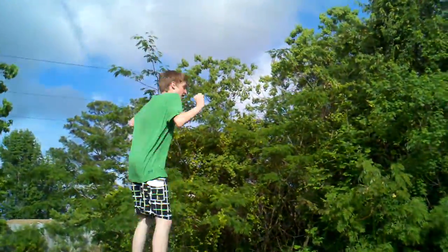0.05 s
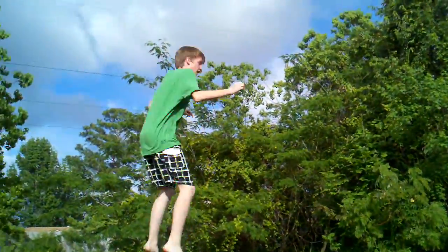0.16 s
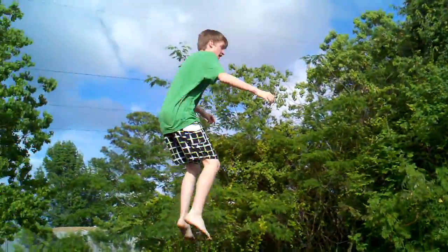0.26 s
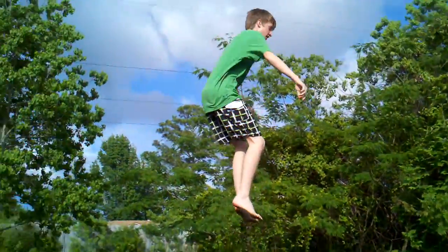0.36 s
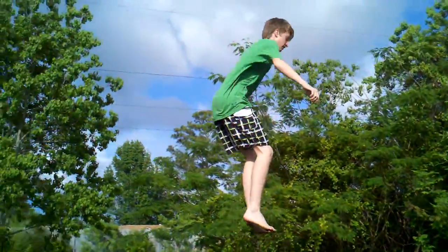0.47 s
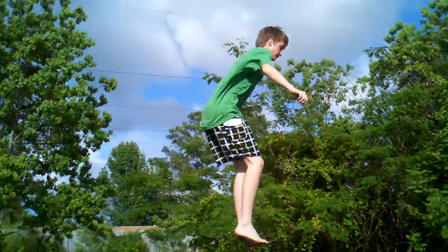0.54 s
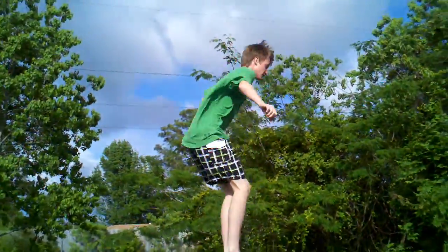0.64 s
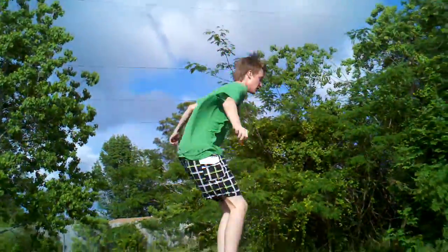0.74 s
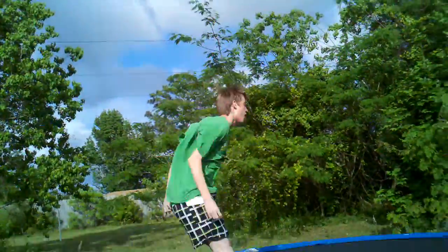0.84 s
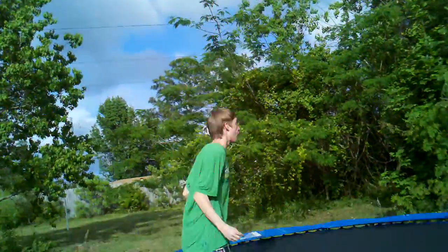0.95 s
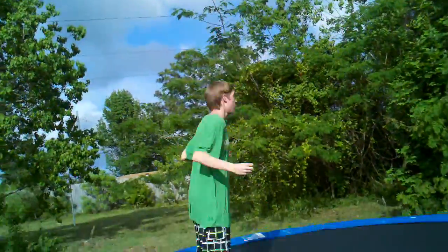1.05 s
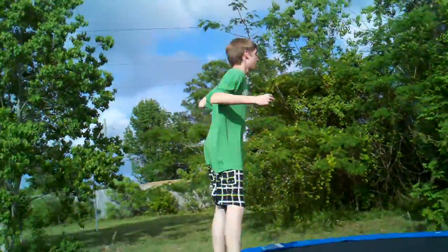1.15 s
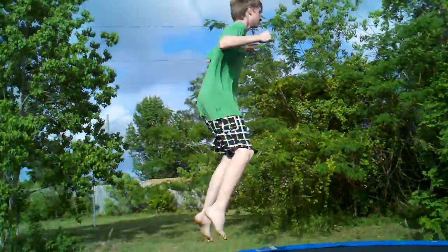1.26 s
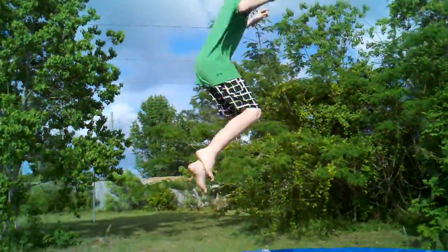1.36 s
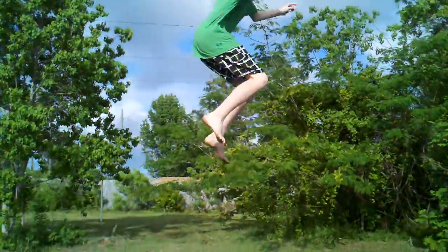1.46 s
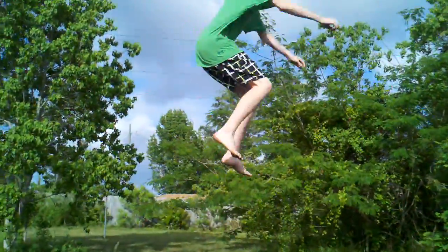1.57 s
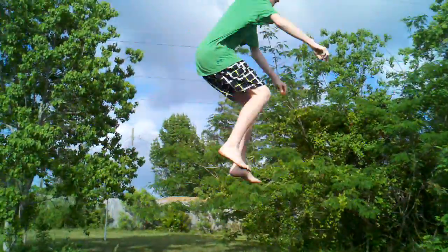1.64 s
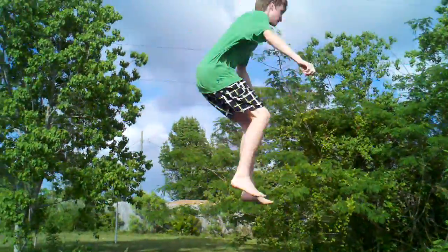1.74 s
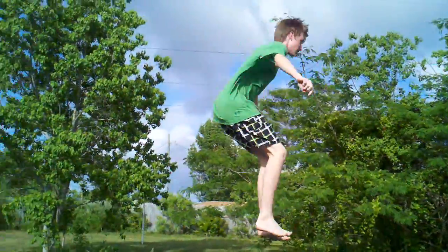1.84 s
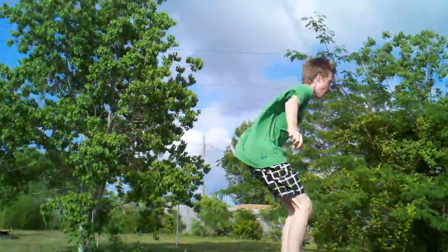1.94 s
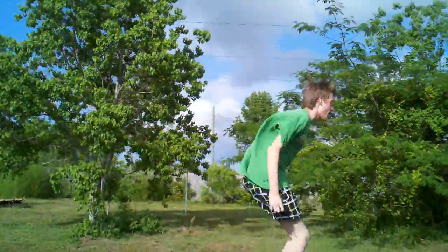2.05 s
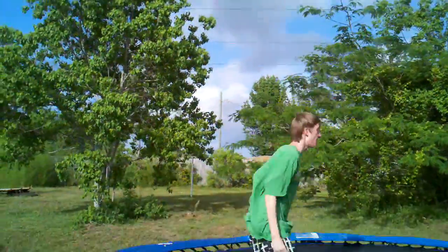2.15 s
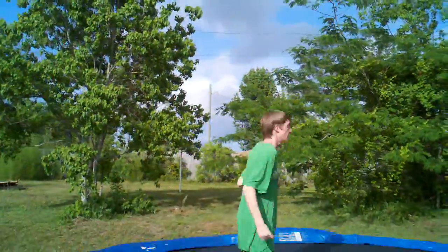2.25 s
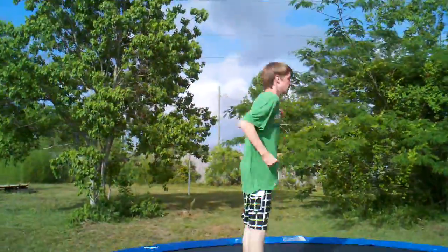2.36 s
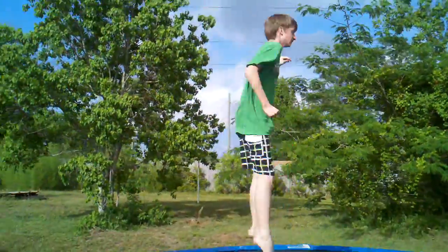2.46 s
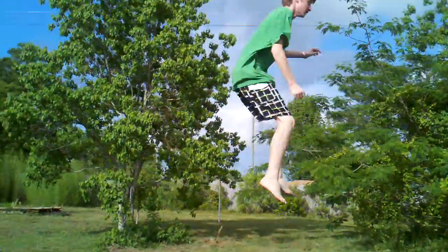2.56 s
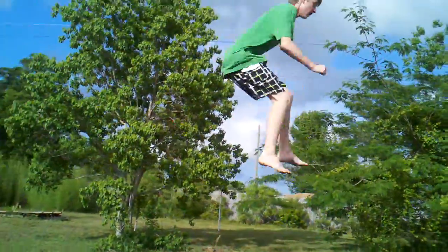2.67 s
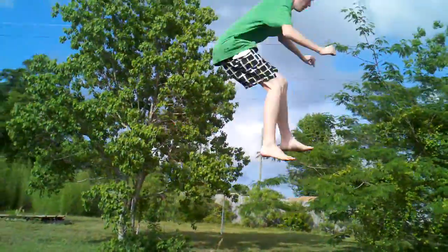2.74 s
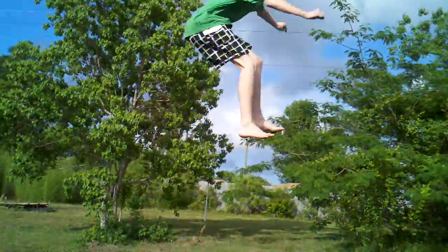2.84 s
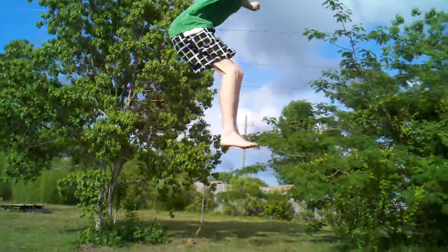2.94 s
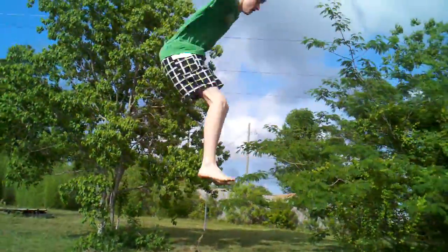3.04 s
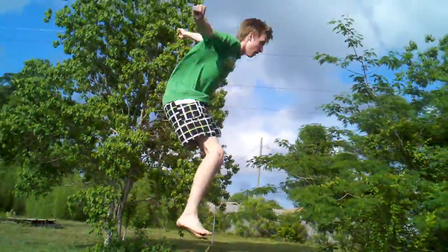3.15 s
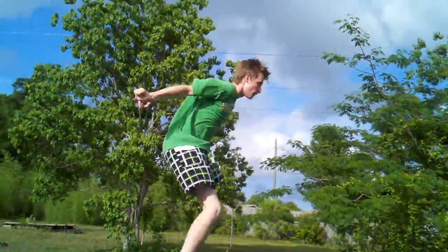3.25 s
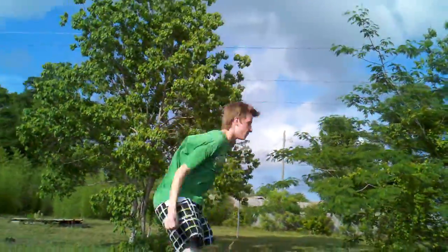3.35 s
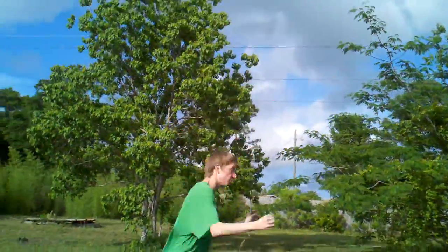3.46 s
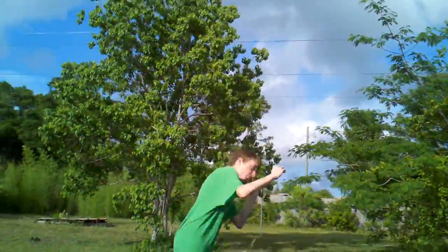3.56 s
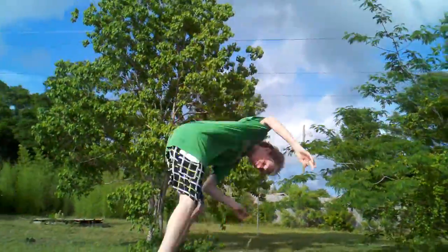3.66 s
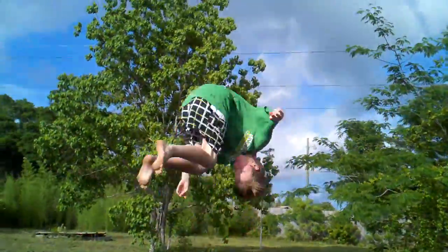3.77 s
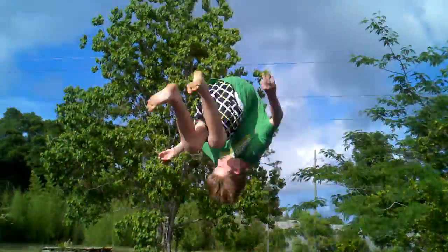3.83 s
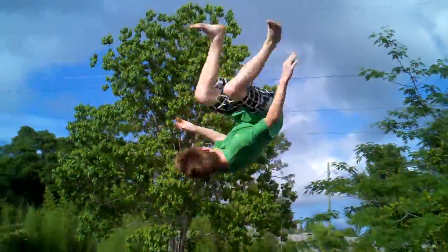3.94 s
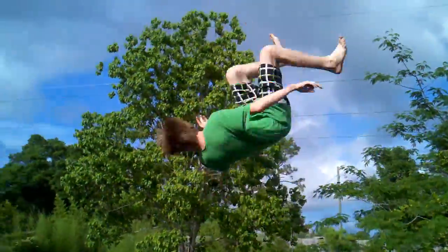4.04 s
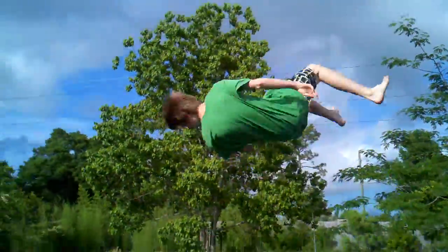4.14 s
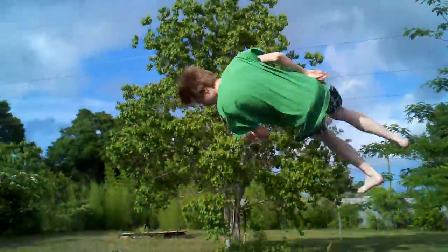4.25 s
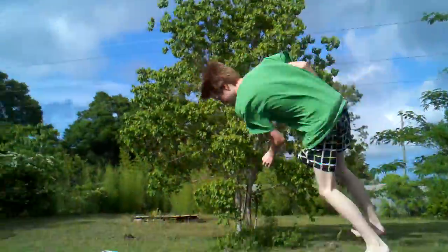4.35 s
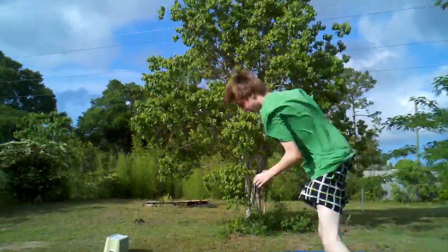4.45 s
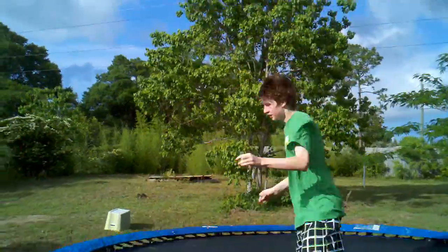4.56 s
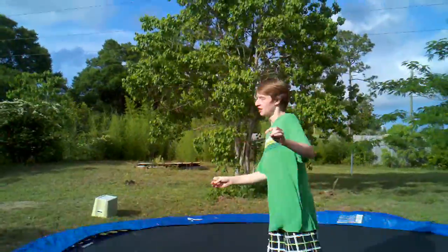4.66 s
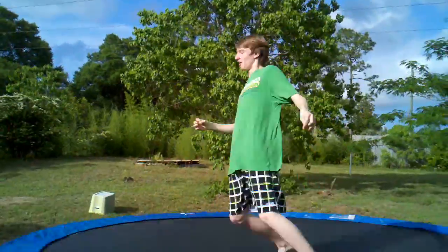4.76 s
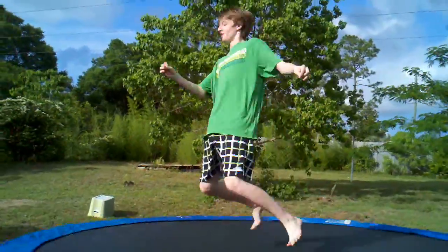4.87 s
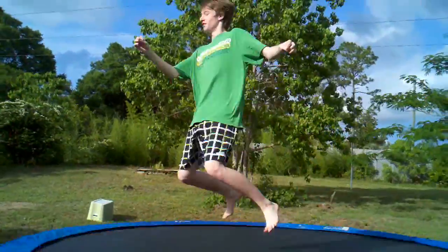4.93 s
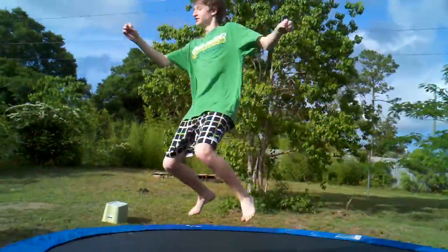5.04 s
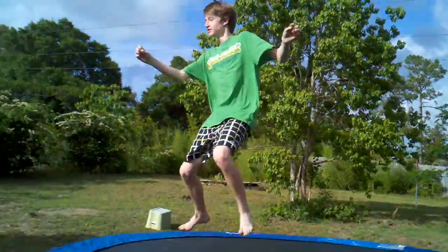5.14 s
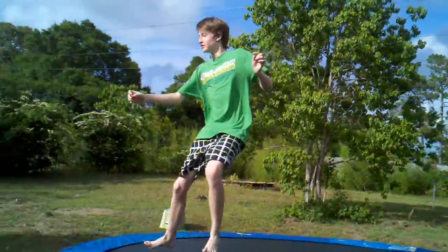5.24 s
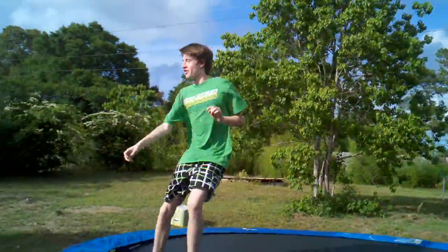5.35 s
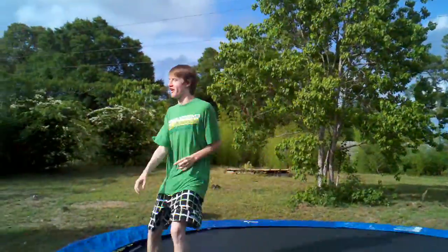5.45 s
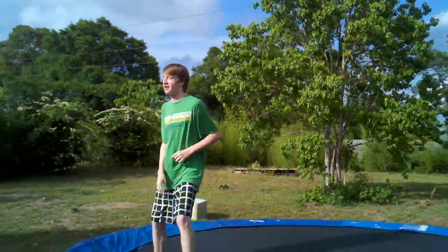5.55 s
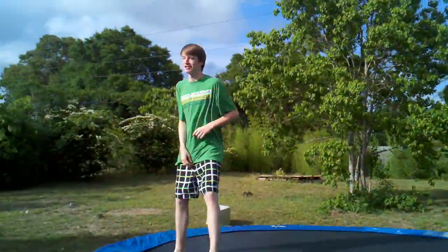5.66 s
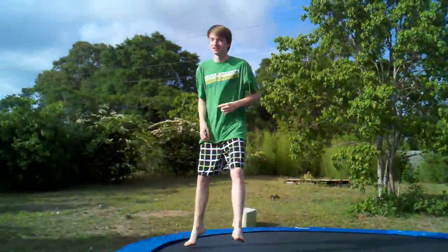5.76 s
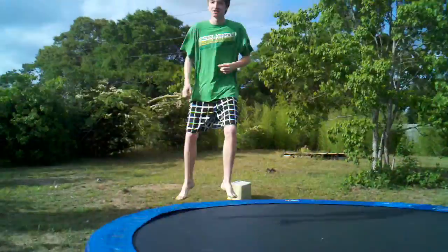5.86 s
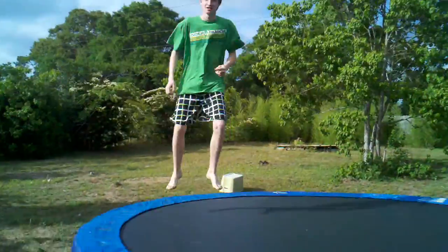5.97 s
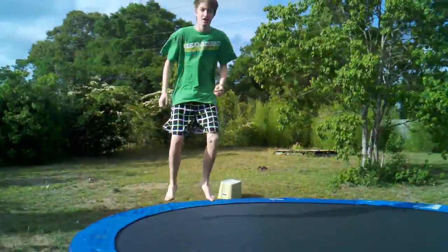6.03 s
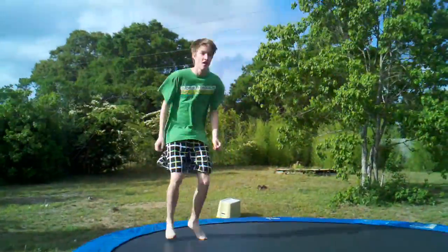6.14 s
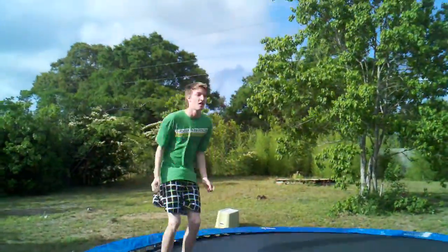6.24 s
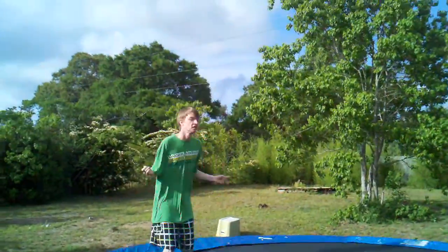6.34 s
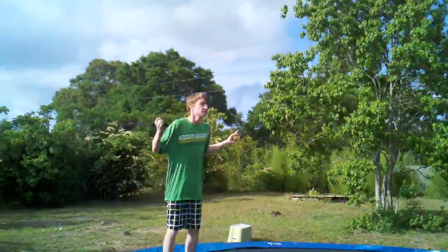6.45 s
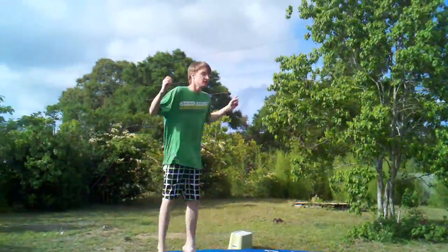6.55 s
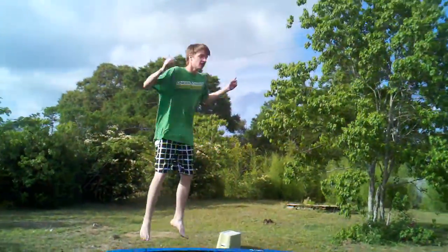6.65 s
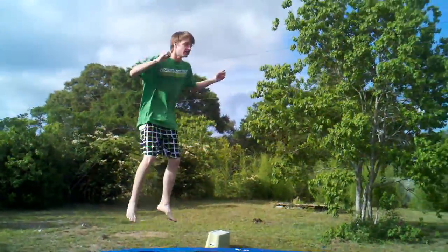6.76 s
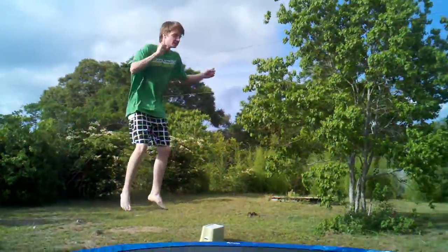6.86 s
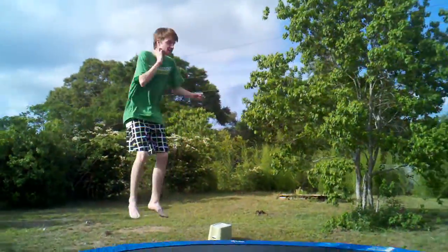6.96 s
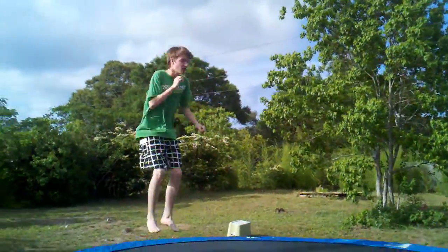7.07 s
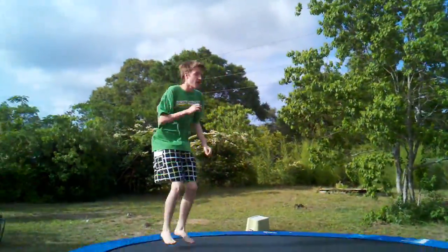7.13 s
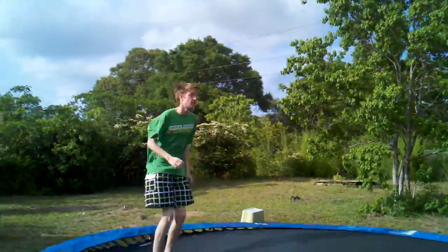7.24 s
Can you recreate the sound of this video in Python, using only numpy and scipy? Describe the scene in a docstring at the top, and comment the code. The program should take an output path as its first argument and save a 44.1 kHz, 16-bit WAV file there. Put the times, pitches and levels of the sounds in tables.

```python
"""Trampoline bounces: filtered noise hisses and rushes through the mat as it sinks and rises.
On deep landings the springs creak: resonant grating, gliding squeaks, sharp slips and frame knocks.
Coils sing and ping, loose springs tick, and the sinking mat shoves a low push of air.
Behind: traffic noise, whines and a far engine on one bearing that moves as the camera pans,
rustling leaves all round, and low noise puffs of breeze on the camera's two microphone ports."""
import sys
import numpy as np
from scipy import signal
from scipy.fft import rfft, irfft
from scipy.io import wavfile
from scipy.ndimage import uniform_filter1d, map_coordinates

SR = 44100
rng = np.random.default_rng(int(sys.argv[2]) if len(sys.argv) > 2 else 0)


def inscribe(sig):
    """Save sig as 16-bit PCM at rate SR to the path in sys.argv[1].

    A 1-D sig is mono; a 2-D sig holds one channel per row.
    Samples are clipped to [-1, 1] before scaling.
    """
    pcm = np.round(np.clip(np.atleast_2d(sig).T, -1, 1) * 32767)
    wavfile.write(sys.argv[1], SR, pcm.astype(np.int16))


N = 321930
T = np.arange(N) / SR
FREQ_HZ = np.fft.rfftfreq(N, 1 / SR)

# Bounces: (touchdown [s], foot contact ramp [s], touch hiss [dB], fastest sinking [s], sinking half length [s],
#           sinking hiss [dB], fastest rising [s], rising hiss [dB], settling time per 20 dB [s],
#           hollow rush re hiss [dB], low push of air re sinking hiss [dB])
BOUNCES = [(-.27, .03, -40, -.17, .06, -24, .02, -28.3, .3, -9.5, -13),
           (.875, .03, -40, 1.008, .053, -21.5, 1.22, -33.3, .46, -12, -10),
           (2.105, .09, -30, 2.258, .056, -23, 2.43, -29.7, .34, -5.5, -3.5),
           (3.395, .03, -46, 3.522, .066, -24.2, 3.785, -31, .25, -7.5, -8),
           (4.539, .003, -31, 4.655, .062, -24.8, 4.88, -26.2, .29, -8.5, -13),
           (5.385, .025, -38, 5.492, .05, -22.7, 5.79, -28, 0.21, -9, -16),
           (6.25, .06, -33, 6.388, .052, -24.5, 6.61, -26.8, .25, -8, -16),
           (7.25, .04, -43, 7.38, .06, -27, 7.63, -30, .3, -1, -13)]
# Swishes as the feet leave or the empty mat flaps: (time [s], half length [s], hiss [dB])
FLAPS = [(0.132, .016, -33), (.345, .025, -48), (1.187, .02, -33), (1.48, .04, -44), (2.555, .03, -31.5),
         (2.635, .035, -35), (3.912, .02, -36), (4.03, .035, -48), (5.07, 0.029, -35), (6.017, .025, -37),
         (6.648, .028, -28)]
# Hiss spectrum of the weave: (frequency [Hz], level [dB])
WEAVE_SPECTRUM = [(500, -45), (1500, -6), (2700, 1.5), (4100, -2), (5300, 0), (6600, -1), (8500, 3),
                  (10200, -3.5), (12000, -2), (14000, -4.5)]
# Resonances of the hollow rush: (frequency [Hz], width [Hz], level [dB])
MAT_MODES = [(470, 1100, 8), (1210, 190, 4.5), (1476, 400, 6.5), (2020, 300, 1.5)]
# Rush spectrum after the resonances: (frequency [Hz], level [dB])
RUSH_SPECTRUM = [(150, 2), (400, 7.5), (2200, 5.5), (4500, -1.5)]
# Coils singing out of the hiss: (time [s], half length [s], frequency [Hz], width [Hz], level [dB])
SINGING = [(0.99, 0.022, 4170, 200, -37), (1.193, 0.021, 1460, 90, -37), (4.573, 0.023, 1540, 160, -34),
           (4.863, 0.03, 1490, 160, -32.5), (5.5, 0.025, 1470, 250, -33.5),
           (5.796, 0.062, 7200, 600, -32.5), (6.372, 0.022, 1400, 200, -35), (6.39, 0.03, 2030, 160, -35),
           (6.65, .02, 7450, 250, -28)]
# Springs slipping on their hooks under load: (start [s], length [s], level [dB], frame rumble [dB],
#           squeak pitch at start [Hz], at end [Hz])
CREAKS = [(1.072, 0.043, -26.5, -16.5, 1400, 1270), (2.314, 0.044, -27, -15, 1080, 1350),
          (3.591, 0.044, -28, -15.5, 1250, 1520), (4.724, 0.031, -25.5, -19.5, 1640, 1430)]
# Hardest slips: (time [s], ring envelope peak [dB], ring pitch [Hz], crack re ring [dB])
SLIPS = [(1.0838, -14, 1430, -1), (1.0862, -16, 1700, 0), (1.0985, -22, 1300, 9), (1.1020, -22, 1600, 0),
         (1.1120, -30, 1250, 10), (2.3245, -24, 1900, 3), (2.329, -21.5, 1100, 5), (2.3355, -21.5, 1400, 7),
         (2.3505, -22, 1300, 5), (3.6028, -23, 1750, 12), (3.607, -22, 1150, 5), (3.6142, -23, 1350, 6),
         (3.630, -18.5, 1900, 7), (3.6335, -26, 2000, 11), (4.7258, -17.5, 1650, -2),
         (4.7342, -17, 1600, 3), (4.7398, -18.5, 1450, 1), (4.7478, -18.5, 1500, 1)]
# Frame knocks as it takes the load and rocks back: (time [s], envelope peak [dB], pitch [Hz])
KNOCKS = [(1.091, -14, 225), (1.096, -16, 380), (1.106, -18, 230), (1.099, -21, 800), (2.3165, -16, 300),
          (2.349, -12, 220), (3.583, -16, 300), (3.600, -18, 500), (3.630, -17, 330), (4.721, -22, 380),
          (4.734, -18, 480), (4.746, -16, 520), (5.568, -24, 100), (5.912, -17.5, 160), (5.932, -23.5, 85),
          (5.977, -27, 100), (6.354, -21, 440), (6.432, -26, 100)]
# Ring of springs and frame: (frequency [Hz], width [Hz], level [dB])
SPRING_MODES = [(414, 610, 10), (760, 300, 5), (1280, 380, 4), (1830, 420, 5), (3000, 350, -7),
                (4300, 900, -19)]
# Frame rumble spectrum: (frequency [Hz], level [dB])
RUMBLE_SPECTRUM = [(35, -36), (75, -9), (120, -6), (185, 3), (270, -2), (450, -8.5), (1000, -46)]
# Ticks of loose springs: (time [s], level at onset [dB])
TICKS = [(4.008, -46), (4.5407, -28), (6.828, -26.5)]
# Ring of a tick: (frequency [Hz], width [Hz], level [dB])
TICK_MODES = [(3900, 1200, -7), (7700, 1000, 22), (12000, 2500, -19)]
# Traffic bearing as the camera pans: (time [s], angle to the left [degrees])
BEARING = [(0, -43), (1.7, -39), (2.3, -24), (2.9, -26), (4.1, 0), (4.8, 21), (5.3, 46), (7.3, 47)]
# Traffic hum: (time [s], level [dB])
TRAFFIC_LEVEL = [(0, -33), (.7, -32), (1.9, -31), (2.15, -27), (2.5, -30.5), (3.25, -29.8), (4.1, -31.5),
                 (5.1, -29), (6.7, -28.5), (7.3, -30.5)]
# Traffic hum spectrum: (frequency [Hz], level [dB])
TRAFFIC_SPECTRUM = [(25, -46), (60, -13), (125, -6.5), (175, 1.5), (240, 0), (330, 0.5), (480, -2.5),
                    (700, -16.5), (1000, -17), (1500, -24.5), (2500, -34), (5000, -54)]
# Tyre roar of passing cars: (loudest [s], half length [s], level [dB])
CARS = [(.7, 1, -36.5), (2.196, 0.37, -38.5), (6.1, 0.33, -43.5), (7.3, 0.47, -36)]
# Tyre roar spectrum: (frequency [Hz], level [dB])
TYRE_SPECTRUM = [(350, -6.5), (620, 3.0), (800, -4.0), (1200, -18), (2500, -34)]
# Faint whines in the traffic: (start [s], end [s], frequency [Hz], amplitude [dB])
WHINES = [(-.5, .95, 1001, -45.5), (1.3, 2.6, 1001, -54), (.25, 2.35, 942, -50), (-.5, 2.2, 188, -42.5),
          (5.7, 7.6, 1000, -53), (5.75, 7.6, 1055, -46.5), (6.1, 7.6, 938, -47.5), (6.2, 7.6, 588, -47)]
# Distant engine gathering speed: (time [s], firing rate [Hz], second-harmonic amplitude [dB])
ENGINE = [(0, 146, -60), (2.6, 147, -44), (3.4, 150, -40.5), (4.8, 150, -37), (5.3, 153, -37.5),
          (6.2, 153.5, -36), (6.7, 157.5, -37.5), (7.3, 162, -38)]
# Leaf rustle: (time [s], level [dB])
LEAVES_LEVEL = [(0, -47), (.7, -43.5), (2.3, -40.5), (2.9, -43), (3.7, -41.5), (4.3, -49), (5.2, -40.5),
                (6.7, -38), (7.3, -39.5)]
# Leaf rustle spectrum: (frequency [Hz], level [dB])
LEAVES_SPECTRUM = [(40, -8), (200, 6.5), (700, 9.5), (1400, 5), (2500, 1), (4000, -6.5), (5500, -9.5),
                   (8500, -8.5), (11000, -14.5), (14000, -19)]
# Light air between puffs: (time [s], level [dB])
BREEZE_LEVEL = [(0, -63), (3.8, -56), (4.3, -46), (7.3, -45)]
# Puffs on the ports: (time [s], level [dB], half length [s])
PUFFS = [(4.43, -37, .014), (4.68, -38, .12), (5.58, -29, .015), (5.94, -34, 0.03), (6.73, -38, .016)]
# Wind spectrum: (frequency [Hz], level [dB])
WIND_SPECTRUM = [(20, -28), (60, -6), (85, 6), (170, 2), (300, -21), (700, -35), (3000, -70)]
# Colour of the camera's microphones: (frequency [Hz], gain [dB])
MICROPHONE = [(1000, 0), (1600, -.3), (2050, 1), (2400, -.5), (2900, 1.5), (3350, -.5), (3800, -1),
              (4080, 1.8), (4400, -.2), (5400, -.7), (6000, .5), (7000, .7), (9000, .4)]

LIFT_S, LIFT_RUSH_DB = .58, -2.5  # time to gain 20 dB while rising; weaker rush on the way up
STROKE_ROUND_S, WEAVE_FLUTTER_DB = .07, 1.0
STILL_AFTER_S, STILL_FADE_S = .62, .06  # rest, counted from touchdown
WEIGHT_STEEPNESS = 3.5  # weight comes on more suddenly than the mat brakes
FLAP_RUSH_DB, SCRAPE_DB = -9, -2.5  # re flap hiss; hiss of the mat's edge re creak
PINGS_PER_S, PING_DB, PING_SPREAD_DB = 330, -5, 2.4
PING_LOW_HZ, PING_HIGH_HZ, PING_CYCLES = 2800, 13500, 3  # cycles added at the highest pitch
WHUMP_HZ, WHUMP_WIDTH_HZ = 320, 420
SQUEAK_DB = -9  # re grating
FIRST_GRATE_DB, FIRST_GRATE_S = -7, .02  # softer grating around creak onset; time constant
RECOIL_DB, RECOIL_HZ, RECOIL_EARLY_S = -3.5, 135, .010  # re rumble; lead on creak end
SLIP_CYCLES, KNOCK_CYCLES = 1.5, .7  # cycles to envelope peak
WHINE_FADE_S = .4
FIRING_DB, ENGINE_WAVER_HZ = -1, 1.3  # fundamental re second harmonic; speed waver
GUST_DB = 3  # swing of the light air
PORT_LAG_SAMPLES = 17
WIDEN_FULL_HZ, WIDEN_WEAK_HZ, TREBLE_SHARE = 4200, 4900, .3
TOP_HZ = 13930


def mat():
    """Air through the whole weave is unrelated at the ports; rubbing threads add grain, coils ping."""
    hiss_gain, rush_gain = airflow()
    hiss = colour(noise() + .5 * grains(per_s=1600, spread_db=3), WEAVE_SPECTRUM)
    hollow = ring(noise() + .5 * grains(per_s=500, spread_db=3.5), MAT_MODES)
    rush = colour(hollow, RUSH_SPECTRUM)
    hiss = shimmer(hiss, patchy_db=2.7, frames=13) * undb(WEAVE_FLUTTER_DB * walk(45))
    rush = shimmer(rush, patchy_db=3.8, frames=13) * undb(1.4 * walk(40))
    return hiss_gain * (hiss + pings()) + rush_gain * rush


def airflow():
    """Hiss and rush gains: powers of touch, sinking, rising, flaps and edge scrapes add up."""
    hiss_power, rush_power = np.zeros(N), np.zeros(N)
    for (touch_s, contact_s, touch_db, sink_s, half_s, sink_db,
         rise_s, rise_db, settle_s, rush_db, _) in BOUNCES:
        touch = undb(touch_db) * np.clip((T - touch_s) / contact_s, 0, 1) * (T < sink_s)
        down = np.hypot(touch, undb(sink_db) * sinking(sink_s, half_s))
        still_fade = (1 + np.tanh((touch_s + STILL_AFTER_S - T) / STILL_FADE_S)) / 2
        up = undb(rise_db) * stroke(rise_s, LIFT_S, settle_s) * (T >= sink_s) * still_fade
        hiss_power += down ** 2 + up ** 2
        rush_power += undb(rush_db) ** 2 * (down ** 2 + (undb(LIFT_RUSH_DB) * up) ** 2)
    flaps = sum((undb(db) * swell(s, half_s)) ** 2 for s, half_s, db in FLAPS)
    scrapes = sum((undb(db + SCRAPE_DB) * swell(s + .74 * length_s, length_s / 2)) ** 2
                  for s, length_s, db, *_ in CREAKS)
    hiss_gain = np.sqrt(hiss_power + flaps + scrapes)
    rush_gain = np.sqrt(rush_power + undb(FLAP_RUSH_DB) ** 2 * flaps)
    return hiss_gain, rush_gain


def sinking(peak_s, half_s):
    """Sinking speed: steep rise as the weight comes on, then a softer fall."""
    loading = np.exp(-np.minimum(np.abs((T - peak_s) / half_s) ** WEIGHT_STEEPNESS, 20))
    return np.where(T < peak_s, loading, swell(peak_s, half_s))


def stroke(peak_s, rise_s, fall_s):
    """Gain up 20 dB per rise_s to a rounded peak, then down 20 dB per fall_s."""
    decades = np.where(T < peak_s, (peak_s - T) / rise_s, (T - peak_s) / fall_s)
    return uniform_filter1d(10 ** -np.minimum(decades, 10), size=int(STROKE_ROUND_S * SR))


def pings():
    """Rim coils ping at random pitches and strengths, a little apart at the two ports."""
    out = np.zeros((2, N))
    for when, pitch, size, side in rng.random((int(PINGS_PER_S * N / SR), 4)):
        hz = PING_LOW_HZ * (PING_HIGH_HZ / PING_LOW_HZ) ** pitch
        db = PING_DB + PING_SPREAD_DB * min(-np.log(1 - size), 3)
        ping = undb(db) * burst(hz, PING_CYCLES * hz / PING_HIGH_HZ + 1)
        add(out[0], (when * N + side * PORT_LAG_SAMPLES) / SR, ping)
        add(out[1], (when * N + (1 - side) * PORT_LAG_SAMPLES) / SR, ping)
    return out


def singing():
    """Rubbing coils ring now and then: swells of band-passed noise."""
    rub, out = noise(), np.zeros((2, N))
    for s, half_s, hz, width_hz, db in SINGING:
        band = signal.butter(1, [hz - width_hz / 2, hz + width_hz / 2], "band", fs=SR)
        out += undb(db) * swell(s, half_s) * unit(signal.lfilter(*band, rub))
    return out


def whump():
    """The sinking mat shoves air ahead of it like a large soft piston."""
    gain = sum(undb(sink_db + push_db) * sinking(sink_s, half_s)
               for _, _, _, sink_s, half_s, sink_db, *_, push_db in BOUNCES)
    body = [(WHUMP_HZ, WHUMP_WIDTH_HZ, 0)]
    push = unit(ring(ring(noise()[0], body), body))
    return arrive(gain * push, degrees=-4)


def springs():
    """Springs grate harder with load, squeak, slip in jerks and knock the frame; a thump ends each creak."""
    grating = unit(ring(grains(per_s=2200, spread_db=3.5)[0], SPRING_MODES))
    rumble = colour(noise()[0], RUMBLE_SPECTRUM)
    unsteady_rad = walk(250)
    out, kicks, frame = np.zeros((3, N))
    for s, length_s, db, rumble_db, start_hz, end_hz in CREAKS:
        run = uniform_filter1d(1. * ((T > s) & (T < s + length_s)), size=160)
        load = np.clip((T - s) / length_s, 0, 1)
        first = undb(FIRST_GRATE_DB) * np.exp(-np.abs(T - s) / FIRST_GRATE_S)
        squeak_hz = start_hz + (end_hz - start_hz) * load
        squeak = np.sin(2 * np.pi * np.cumsum(squeak_hz) / SR + unsteady_rad)
        grate_gain = np.maximum(first, run * load ** .25)
        out += undb(db) * (grate_gain * grating + run * undb(SQUEAK_DB) * squeak)
        frame += run * load * undb(rumble_db) * rumble
        recoil = undb(rumble_db + RECOIL_DB) * burst(RECOIL_HZ, KNOCK_CYCLES)
        add(frame, s + length_s - RECOIL_EARLY_S, recoil)
    for s, db, hz, crack_db in SLIPS:
        add(out, s, undb(db) * burst(hz, SLIP_CYCLES))
        kicks[int(s * SR)] += undb(db + crack_db)
    for s, db, hz in KNOCKS:
        add(frame, s, undb(db) * burst(hz, KNOCK_CYCLES))
    one_kick = ring(1. * (T == 0), SPRING_MODES)
    out += ring(kicks, SPRING_MODES) / np.abs(one_kick).max()
    return arrive(out + frame, degrees=-5) + undb(-13.0) * scatter(out)


def scatter(x):
    """Mat, ground and fence scatter a short noise tail, down 60 dB in 69 ms."""
    tail = noise()[:, :SR // 4] * undb(-60 * T[:SR // 4] / .069)
    tail /= np.sqrt(np.sum(tail[0] ** 2))
    return signal.fftconvolve(x[None], tail, axes=1)[:, :N]


def ticks():
    """Slack springs tick brightly: decaying noise through high resonances."""
    gain = sum(undb(db) * (T >= s) * np.exp(-np.abs(T - s) / .0036) for s, db in TICKS)
    return gain * unit(ring(noise(), TICK_MODES))


def traffic():
    """Hum, tyre roar, whines and a far engine share one moving bearing."""
    hum = shimmer(colour(noise()[:1], TRAFFIC_SPECTRUM), patchy_db=1.5, frames=50)[0]
    hum = hum * undb(curve(TRAFFIC_LEVEL) + .5 * walk(11))
    passing = sum(undb(db) * swell(s, half_s) for s, half_s, db in CARS)
    tyres = colour(noise()[0], TYRE_SPECTRUM) * passing
    whine = np.zeros(N)
    for start_s, end_s, hz, db in WHINES:
        gain = undb(db + 1.2 * walk(2.83)) * held(start_s, end_s, WHINE_FADE_S)
        whine += gain * np.sin(2 * np.pi * hz * T + .3 * walk(5.5))
    return arrive(hum + tyres + whine + engine(), curve(BEARING))


def engine():
    """First two harmonics of a far engine, wavering in speed and level."""
    hz, db = (curve(np.array(ENGINE)[:, [0, column]]) for column in (1, 2))
    phase = 2 * np.pi * np.cumsum(hz + ENGINE_WAVER_HZ * walk(9)) / SR
    firing = undb(FIRING_DB + 2.5 * walk(5)) * np.sin(phase)
    return undb(db + 2.5 * walk(9)) * (np.sin(2 * phase) + firing)


def leaves():
    """Leaves rustle and tick all round: noise and uneven grains, unrelated at the ports."""
    rustle = colour(noise() + .26 * grains(per_s=1500, spread_db=10.5), LEAVES_SPECTRUM)
    return shimmer(rustle, patchy_db=2, frames=25) * undb(curve(LEAVES_LEVEL) + .8 * walk(8))


def breeze():
    """Light air and soft puffs of wind: low noise, unrelated at the two ports."""
    light_air = undb(curve(BREEZE_LEVEL) + GUST_DB * walk(2.83))
    puffs = sum(undb(db) * swell(s, half_s) for s, db, half_s in PUFFS)
    return (light_air + puffs) * colour(noise(), WIND_SPECTRUM)


def undb(db):
    """Decibels to gain."""
    return 10 ** (np.asarray(db) / 20)


def unit(x):
    """Scale to rms 1."""
    return x / np.sqrt(np.mean(x ** 2))


def noise():
    """White noise, unrelated at the two ports."""
    return rng.standard_normal((2, N))


def grains(per_s, spread_db):
    """Random clicks of uneven size at the two ports, rms 1."""
    hits = rng.random((2, N)) < per_s / SR
    return unit(hits * np.sign(noise()) * undb(spread_db * noise()))


def colour(x, points):
    """Filter by (frequency [Hz], level [dB]) points, joined over log frequency; rms 1."""
    hz, db = np.transpose(points)
    return unit(irfft(rfft(x) * undb(np.interp(np.log(FREQ_HZ + 1), np.log(hz), db)), N))


def ring(x, modes):
    """Parallel resonances (frequency [Hz], width [Hz], level [dB])."""
    response = 0
    for hz, width_hz, db in modes:
        damping = 1j * FREQ_HZ * width_hz
        response = response + undb(db) * damping / (hz ** 2 - FREQ_HZ ** 2 + damping)
    return irfft(rfft(x) * response, N)


def shimmer(x, patchy_db, frames):
    """Narrow bands swell and fade on their own, in patches up to `frames` steps of 5.8 ms; rms 1."""
    z = signal.stft(x, nperseg=1024, noverlap=768)[2]
    patch = np.outer(np.hanning(7), np.hanning(frames))
    field = signal.fftconvolve(rng.standard_normal(z.shape[1:]), patch, "same")
    z = z * undb(patchy_db * unit(field))
    return unit(signal.istft(z, nperseg=1024, noverlap=768)[1][:, :N])


def walk(rate_hz):
    """Random levels held 1 / rate_hz and slewed twice; spread near 1."""
    k = int(SR / rate_hz)
    steps = np.repeat(rng.standard_normal(N // k + 1), k)
    return 1.3 * uniform_filter1d(uniform_filter1d(steps, k), k)[:N]


def curve(rows):
    """(time [s], value) points, interpolated per sample."""
    return np.interp(T, *np.transpose(rows))


def swell(s, half_s):
    """Gaussian rise and fall, down to 1/e at half_s."""
    return np.exp(-np.minimum(((T - s) / half_s) ** 2, 50))


def held(start_s, end_s, fade_s):
    """Gain 1 between two moments, with a fade centred on each."""
    return np.clip(np.minimum(T - start_s, end_s - T) / fade_s + .5, 0, 1)


def burst(hz, cycles):
    """Sine whose envelope builds for a number of cycles to a peak of 1 and dies away."""
    age = T[:int(8 * cycles / hz * SR)] * hz / cycles
    return age * np.exp(1 - age) * np.sin(2 * np.pi * cycles * age)


def add(out, s, sound):
    """Mix a short sound in at a time."""
    start = int(s * SR)
    part = sound[:max(N - start, 0)]
    out[start:start + len(part)] += part


def arrive(x, degrees):
    """A distinct source reaches the nearer port first; positive angles lie left."""
    lead = PORT_LAG_SAMPLES / 2 * np.sin(np.radians(degrees))
    return np.array([map_coordinates(x, [np.arange(N) + side * lead], order=3, mode="nearest")
                     for side in (1, -1)])


def scene():
    """Sound pressure at the left and right ports."""
    trampoline = mat() + singing() + whump() + springs() + ticks()
    return trampoline + traffic() + leaves() + breeze()


def record(dry):
    """Colour by microphone, subtract the delayed opposite port to widen (less in treble), cut the top."""
    ports = rfft(dry) * undb(np.interp(FREQ_HZ, *np.transpose(MICROPHONE)))
    share = np.interp(FREQ_HZ, [WIDEN_FULL_HZ, WIDEN_WEAK_HZ], [1, TREBLE_SHARE])
    delay = np.exp(-2j * np.pi * FREQ_HZ * PORT_LAG_SAMPLES / SR)
    wide = irfft(ports - share * delay * ports[::-1], N)
    return signal.sosfilt(signal.ellip(12, .2, 70, TOP_HZ, fs=SR, output="sos"), wide)


dry = scene()
out = record(dry)
inscribe(out)
```